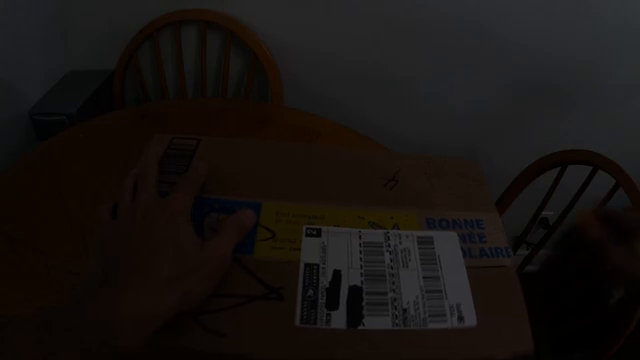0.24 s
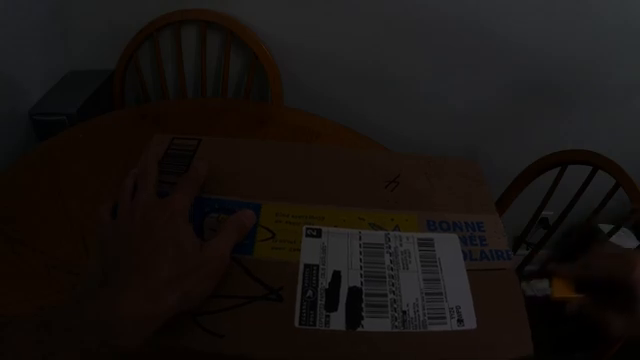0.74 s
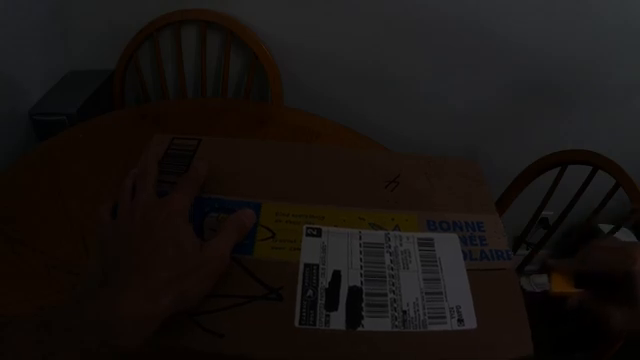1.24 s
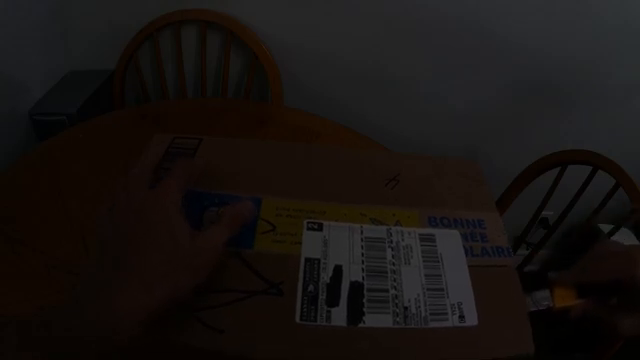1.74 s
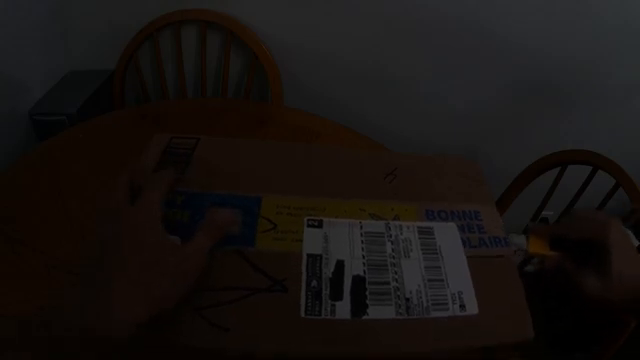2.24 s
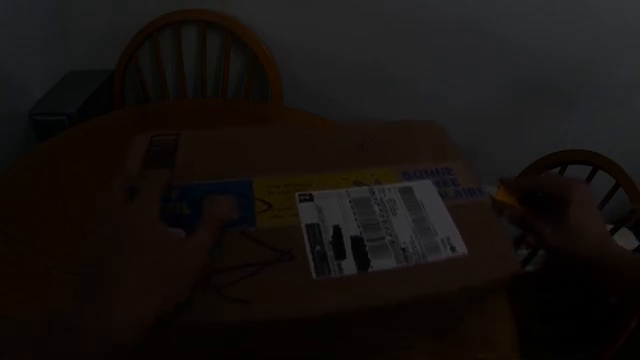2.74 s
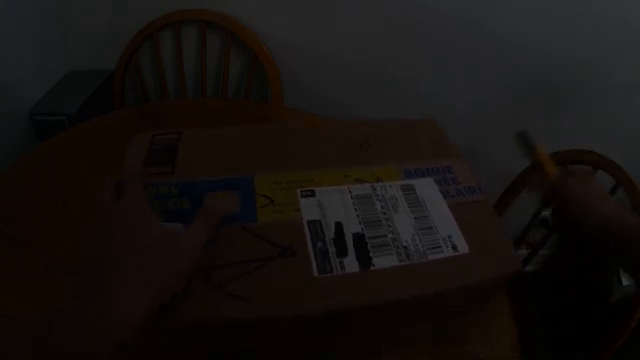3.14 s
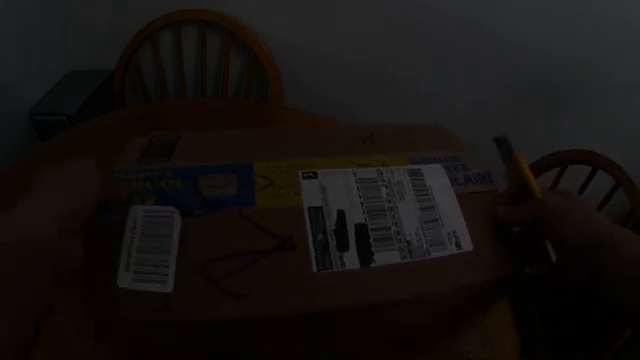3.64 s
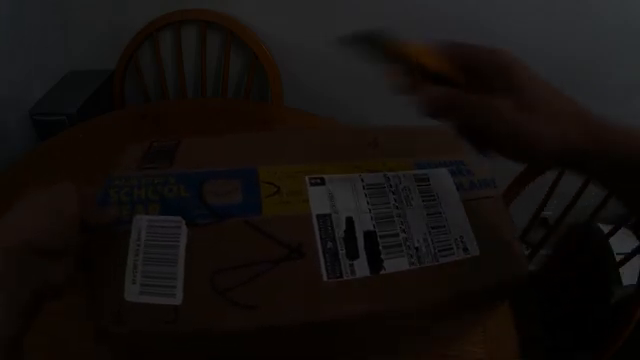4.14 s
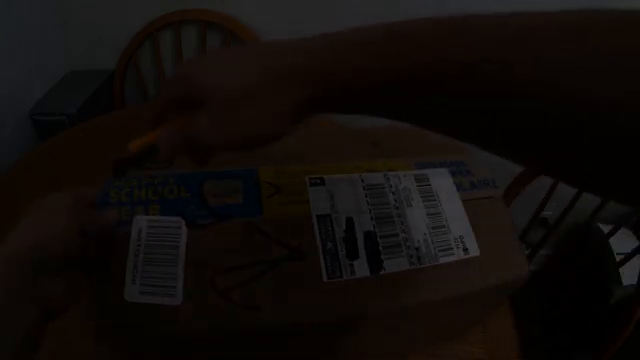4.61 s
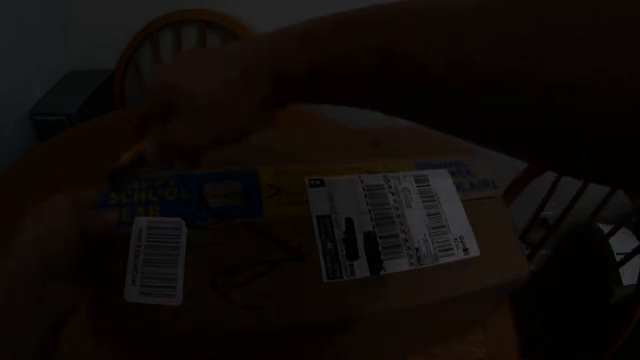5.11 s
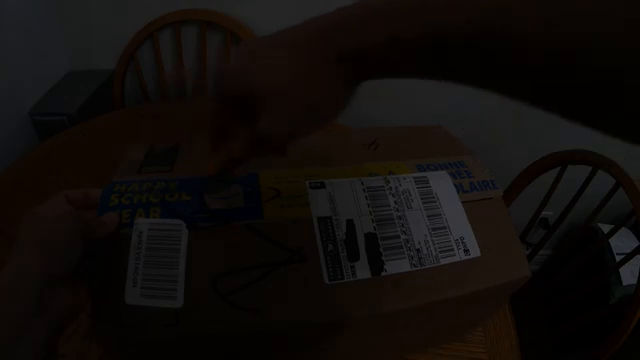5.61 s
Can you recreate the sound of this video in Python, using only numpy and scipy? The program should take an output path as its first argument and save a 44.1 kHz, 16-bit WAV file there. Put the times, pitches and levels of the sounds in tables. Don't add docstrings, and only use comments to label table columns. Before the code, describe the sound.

A blade bursts packing tape on a cardboard box with a thud and sharp rip, then handling knocks, and finally a hard pop and long raspy cut.

```python
import sys
import numpy as np
from scipy import signal
from scipy.fft import rfft, irfft, next_fast_len
from scipy.io import wavfile
from scipy.ndimage import uniform_filter1d

SR = 44100
rng = np.random.default_rng(int(sys.argv[2]) if len(sys.argv) > 2 else 0)


def store_wav(level_fs):
    pcm = np.round(np.clip(np.atleast_2d(level_fs), -1, 1) * 32767)
    wavfile.write(sys.argv[1], SR, pcm.T.astype(np.int16))


def ratio_of_db(decibels):
    return 10 ** (np.asarray(decibels, float) / 20)


N = 258867
CLOCK = np.arange(0, N / SR + .001, .001)

# centre_hz, width_hz, level_db
TABLE_MODES = [(52.7, 21, -8), (96.7, 30, -2), (148, 27, 0.5)]
PANEL_MODES = [(203, 29, -1.5), (255, 18.7, 0), (310, 36, -0.5), (390, 49, -0.5), (456.3, 45, 2),
               (586, 160, -8)]
BLADE_MODES = [(772, 183, -5.5), (1227, 406, -4), (2277, 720, -2), (2740, 880, -1), (3400, 720, -1.5),
               (4330, 740, -3.5), (5250, 500, -8)]
TAPE_MODES = [(6950, 1400, -2.5), (9750, 1150, 0.3), (11930, 2160, -0.14), (13830, 2500, -0.8),
              (15360, 840, 2)]

# frequency_hz, density_db (per Hz)
HUSH_SPECTRUM = [(15, -54), (25, -10.5), (137, 2.5), (269, -8), (438, -8), (589, -11), (815, -16.5),
                 (1130, -17.5), (1330, -18), (2820, -21), (15900, -23)]
# frequency_hz, t60_s
ROOM_DECAY = [(100, 0.18), (500, 0.26), (3000, 0.25), (12000, 0.28)]

# peak_s, blade_db, film_over_blade_db, rise_s, fall_s
SCRAPES = [(.01, -68, -6, .1, .3), (0.091, -30.5, -2, 0.017, 0.19), (.235, -52, -4, .5, .07),
           (2.96, -66, 2, .2, .2), (.53, -56, -14, .03, 0.32), (.74, -63, -2.5, 0.55, 0.71),
           (1.226, -68.5, -4, 0.21, .15), (1.456, -51, -3.5, 0.088, 0.19), (1.635, -57, -3, 0.088, 0.73),
           (2.055, -56, -3.5, 0.21, .17), (2.425, -65.5, 0, 0.35, 1.1), (2.66, -58, -2, 0.32, .1),
           (2.735, -43.5, -2, 0.16, .05), (2.75, -33, -0.5, .03, .03), (2.8, -46.5, -5, 0.12, 0.19),
           (3.12, -66, 1, 0.24, 3.9), (3.51, -62, 2.5, 0.35, 0.23), (3.58, -46, 3, 0.061, 0.19),
           (3.75, -58.5, -9, 0.76, 0.38), (3.84, -56.5, 2, 0.23, 0.15), (4.013, -59.5, -4, 0.13, 0.15),
           (4.477, -58.5, -6, 0.21, 0.33), (4.58, -59.5, -9, 0.38, 0.17), (4.8, -68, -4.5, 0.58, 4),
           (4.965, -53, -7.5, 0.046, 0.37), (5.159, -28, -6, 0.0094, 0.18)]
# peak_s, level_db, panel_pitch_hz, rise_s, fall_s
PRESSES = [(.03, -63, 300, .3, .3), (0.089, -29, 266, 0.029, 0.16), (.19, -43, 450, 0.14, 0.07),
           (.52, -43.5, 330, 0.0095, 0.13), (.62, -49, 222, .12, 0.19), (.76, -53.5, 400, 0.32, 0.13),
           (.88, -56, 314, 0.16, 0.12), (.99, -62.5, 260, .2, 0.096), (1.226, -59, 374, 0.13, 0.092),
           (1.43, -44.5, 377, 0.041, 0.19), (1.63, -51.5, 300, .12, 0.25), (1.72, -51.5, 415, 0.29, 0.13),
           (1.87, -58.5, 444, .2, 0.14), (2.065, -51.5, 274, 0.16, 0.094), (2.41, -59.5, 410, .2, 0.27),
           (2.545, -52, 330, 0.29, 0.16), (2.745, -34.5, 337, 0.14, 0.1), (2.84, -44.5, 250, 0.24, 0.11),
           (3.21, -53, 330, .2, 0.39), (3.36, -48.5, 218, .3, 0.83),
           (3.51, -44, 310, .04, .05), (3.585, -37.5, 294, 0.1, 0.17), (3.77, -46, 337, 0.2, 0.18),
           (4.013, -52.5, 296, 0.13, 0.088), (4.43, -52, 405, .12, .1), (4.477, -49.5, 397, 0.2, 0.19),
           (4.57, -52.5, 310, .2, 0.16), (4.76, -57.5, 221, 0.18, 0.71), (4.97, -44.5, 307, 0.043, 0.18),
           (5.03, -47, 300, 0.15, 0.094), (5.12, -55.5, 260, 0.091, 0.14), (5.16, -31, 290, 0.0069, 0.32)]
# start_s, length_s, level_db
SHOVES = [(0.08, 0.067, -42), (0.527, .065, -46), (0.658, 0.15, -53), (1.002, 0.14, -69),
          (1.413, 0.053, -56), (1.58, .24, -58), (2.032, .05, -60), (2.36, .09, -67), (2.444, 0.077, -56.5),
          (2.658, 0.21, -46), (3.103, .28, -63.5), (3.395, .37, -50), (3.892, 0.246, -68),
          (4.418, 0.095, -62), (4.733, 0.36, -53.5), (5.16, 0.26, -48.5), (5.5, .12, -56),
          (5.65, 0.11, -47), (5.8, .07, -53)]
SHOVE_RISE_S, SHOVE_FALL_S = 0.025, 0.13
SPAN_DB = 30.5
# time_s, pressure_db, film_over_blade_db, panel_pitch_hz, blade_tilt (in units of 3 dB per
CUT = [
    (5.2, -50, -22, 310, -1),
    (5.29, -45.5, -5, 345, -0.8),
    (5.373, -42.5, -1, 270, 0),
    (5.46, -41.5, 3.5, 259, 0),
    (5.549, -41, 7.5, 263, -0.7),
    (5.677, -37, 8, 325, -1.7),
    (5.765, -36, 9, 295, -0.3),
    (5.817, -40.5, 8, 345, -2.6),
    (5.87, -39.5, 14.5, 298, -1.5),
]
# time_s, blade_tilt (units of 3 dB per octave), film_tilt (units of
# 5 dB per octave)
ANGLES = [(.08, -1.06, 0.2), (.27, -1, -3), (.5, -2.5, 1), (.76, -1.5, 1), (.9, -0.9, 1.5),
          (1.45, -1.4, 3.5), (1.68, -2.5, 1.5), (1.97, 0.2, 1.3), (2.1, -2, 0), (2.65, -1.5, 0.9),
          (2.8, -1.5, -0.3), (3.35, -1.5, 0.7), (3.54, 0, -0.5), (3.66, -1.5, 0.9), (3.85, -1.2, 1),
          (4.0, -2.5, 0.5), (4.479, -1.1, 0.4), (5.1, -1.2, -0.5)]
CUT_BLADE_DB = -1.57
BLADE_YIELDS = 0.74
FILM_FALL = 0.8
FILM_TILT, FILM_BRIGHTENS = 0.1, 0.15

# start_s, length_s, pitch_hz, level_db
SQUEAKS = [(0, .012, 3400, -64), (0.02, 0.016, 3480, -69), (.525, .065, 2100, -66),
           (.095, 0.012, 9800, -31), (5.39, .07, 1550, -58), (.685, .032, 3420, -66),
           (.712, .028, 3200, -67), (5.405, .05, 2080, -56), (.862, 0.025, 1230, -55),
           (2.04, 0.032, 5400, -63), (2.04, .04, 7800, -66), (2.744, 0.012, 950, -31),
           (4.7, 0.081, 1000, -67), (4.956, .014, 3550, -52), (4.971, .011, 3550, -49),
           (4.986, .009, 3800, -54), (5.005, .03, 3800, -62), (4.77, .036, 14450, -71),
           (4.845, .036, 14500, -71), (5.024, .036, 14400, -69), (5.096, .036, 14450, -71),
           (2.04, 0.023, 2900, -53.5), (5.157, 0.01, 4450, -26), (5.156, 0.02, 6850, -32.5),
           (3.506, 0.014, 1100, -54), (3.555, .014, 1050, -52), (1.455, .05, 4350, -63)]
# start_s, length_s, pitch_hz, level_db
BREAKTHROUGH = (5.1743, .0006, 4300, -8.5)

# start_s, tape_peak_db, blade_db (re tape), t60_s
SNAPS = [(0.0798, -27, 5.5, 0.048), (.0964, -18, -5, .022), (0.11, -26, 1.5, .024), (.513, -53, 8, 0.03),
         (.863, -46, 2, 0.02), (1.4177, -45.5, -3, .035), (2.0453, -37, 1, .026), (2.7072, -37, -2, 0.05),
         (2.744, -27.5, -3, 0.036), (3.5775, -23.5, -7, 0.024), (3.556, -42, -11, .03),
         (3.503, -50, -6, .06), (3.742, -58, 6, .02), (3.8546, -41, 1, 0.026), (4.0001, -52, 8, 0.03),
         (4.9636, -59, -5, .027), (5.1551, -16, 2.5, 0.025)]
# start_s, tape_peak_db, blade_db (re tape)
TICKS = [(.7916, -44, 2), (.8714, -52, -8), (1.9914, -47, 3), (2.0385, -36.5, 0), (2.0943, -41.5, 0.5),
         (2.387, -55, -7), (2.4443, -47, 0), (2.507, -41, -4), (2.6274, -43.5, -5.5), (2.6704, -55, -7),
         (2.7228, -26.5, -5), (2.7474, -25, -1), (2.8504, -48, -1), (3.5661, -30, -15), (3.9772, -52, -5),
         (4.4588, -47, 7.5), (4.9866, -47, 3), (5.0739, -51, -3), (5.1742, -13, -2), (5.5744, -36, -22)]
TICK_T60_S = 0.014

# start_s, peak_db, pitch_hz
THUDS = [(.08, -23, 150), (.0868, -19, 150), (.1065, -25, 155), (.119, -27, 150), (.51, -27, 170),
         (.53, -32, 170), (.543, -33, 149), (.565, -33, 160), (.59, -38, 213), (.612, -39, 227),
         (.722, -38, 140), (.812, -37, 95), (.684, -35.5, 124), (.789, -37, 125), (.853, -35.5, 138),
         (2.037, -39.5, 124), (2.453, -39.5, 142), (2.528, -31.5, 148), (2.551, -30.5, 155),
         (2.747, -20.5, 169), (2.911, -35.5, 108), (3.583, -38, 196), (5.159, -18, 130),
         (5.174, -16.5, 151), (5.194, -19.5, 148)]
KNOCKS = [(.081, -23, 622), (.097, -23.5, 826), (.103, -20, 282), (.111, -24.5, 614), (.122, -26.5, 252),
          (.514, -37, 408), (.52, -43, 577), (.548, -42.5, 570), (.79, -44, 380), (.856, -39.5, 467),
          (.858, -41, 323), (.872, -42.5, 400), (.2, -42, 485), (.215, -39, 507), (3.556, -32, 334),
          (3.72, -44, 328), (3.775, -39.5, 305), (3.83, -48, 560), (3.865, -47, 550), (2.45, -46, 310),
          (1.426, -38, 380), (1.459, -35, 366), (2.749, -28, 432), (2.918, -38.5, 200), (3.149, -48.5, 390),
          (3.506, -33.5, 317), (3.572, -29.5, 302), (3.744, -29, 390), (4.458, -38, 413),
          (4.485, -34.5, 397), (4.718, -45.5, 317), (4.968, -33, 297), (5.009, -32, 281), (5.157, -18, 463),
          (5.164, -23, 294), (5.175, -21.5, 410), (5.184, -20.5, 310), (5.199, -20.5, 468),
          (5.206, -27, 400), (5.216, -28, 410), (5.226, -29, 480), (5.753, -21, 320)]
BUCKLES = [(.5122, -29, 240), (.5153, -19, 175), (.0815, -21, 300), (.148, -31, 500), (2.697, -33, 330),
           (2.712, -24, 310), (2.725, -23, 402), (2.7485, -13, 350), (2.76, -23.5, 220), (2.77, -20.5, 256),
           (2.778, -20.5, 420), (2.799, -25, 264), (2.816, -34, 300), (2.86, -36, 250), (2.885, -39, 300),
           (1.545, -47, 200), (1.5, -44, 420)]
ROCKING = [(1.583, -46, 115), (1.617, -43, 90), (1.652, -39, 115), (1.677, -39, 100), (1.718, -42, 105),
           (1.752, -44, 110), (1.788, -41, 125), (1.82, -44, 100), (1.837, -42, 116), (4.754, -41, 95),
           (4.793, -43, 95), (4.832, -45, 95), (4.871, -45, 95), (4.91, -46, 95)]
JUDDERS = [(5.517, -33, 323), (5.527, -30.5, 310), (5.589, -33, 310), (5.606, -23, 300),
           (5.633, -23.5, 285), (5.652, -28, 294), (5.664, -21, 264), (5.683, -31, 187),
           (5.695, -28.5, 280), (5.71, -29.5, 334), (5.72, -25, 290), (5.738, -34, 340),
           (5.771, -32.5, 149), (5.775, -34, 382), (5.6, -36, 450), (5.805, -37, 480), (5.832, -35, 430)]
CRACKLES = [(.081, -22, 2460), (.094, -36, 2470), (.103, -28, 3870), (.104, -28, 2360), (.109, -29, 3700),
            (.12, -39, 3620), (.087, -32, 3000), (.098, -31, 2900), (.115, -33, 2200), (.127, -35, 3000),
            (.136, -36, 2600), (.151, -34, 2150), (.515, -46, 1150), (.791, -52, 950), (1.546, -55, 1360),
            (1.617, -53, 1010), (1.628, -57, 3200), (2.812, -46, 2250), (2.826, -47, 1200),
            (2.858, -49, 1000), (2.885, -52, 900), (2.925, -52, 1300), (4.0, -53, 1100), (5.222, -38, 3500),
            (1.43, -58, 4400), (1.446, -51, 3780), (1.452, -55, 4400), (1.449, -50, 2300),
            (1.456, -46, 2230), (1.464, -55, 3760), (1.473, -49, 2350), (2.629, -52, 830),
            (2.648, -55, 4200), (2.655, -42, 985), (2.672, -46, 820), (2.696, -37, 1020),
            (2.709, -46, 3900), (2.723, -44, 3630), (2.744, -36, 2430), (2.75, -30.5, 3200),
            (2.779, -42, 1000), (2.799, -42, 900), (2.851, -48, 3420), (3.565, -47, 4300),
            (3.565, -46, 1150), (3.578, -32.5, 4350), (3.579, -34, 2590), (3.595, -43, 2370),
            (3.743, -47, 1200), (3.579, -40, 5400), (3.843, -51, 4110), (3.855, -44.5, 3590),
            (5.157, -23, 2170), (5.1748, -23, 4280), (5.181, -28, 2360), (5.183, -32, 4300),
            (5.182, -32, 3500), (5.198, -35, 2600), (5.162, -30, 4500), (5.158, -29, 1150),
            (5.19, -32, 1200), (.081, -31, 5100), (.082, -29, 3500)]
THUD_T60_S, KNOCK_T60_S, BUCKLE_T60_S = 0.059, 0.053, 0.026
ROCK_T60_S, JUDDER_T60_S, CRACKLE_T60_S = 0.06, 0.055, 0.017

# time_s, upper_hz, upper_db, lower_hz, lower_db (re blade friction)
BITES = [(5.14, 4450, -40, 2150, -34), (5.16, 4400, -20, 2190, -10), (5.28, 4300, -12, 2640, -12),
         (5.35, 4500, -7, 3150, -13), (5.42, 4850, -8, 3400, -9), (5.46, 4500, -12, 3300, -15),
         (5.51, 5000, -7, 2800, -25), (5.55, 4400, -6, 3050, -13), (5.61, 4900, -13, 3150, -11),
         (5.68, 4300, -8, 3500, -10), (5.75, 4950, -8, 3300, -17), (5.79, 4550, -13, 3150, -6),
         (5.87, 4830, -16, 3220, -9)]
BITE_WIDTH_HZ = 380
GAP_HZ, GAP_WIDTH_HZ, GAP_DB = 5800, 450, -2.5


def unit(x):
    return x / np.sqrt(np.mean(x ** 2) + 1e-20)


def along(points, hz):
    f, v = np.transpose(points)
    return np.interp(np.log(hz + 1), np.log(f + 1), v)


def filtered(x, response):
    size = next_fast_len(N + SR // 2)
    return irfft(rfft(x, size) * response(np.fft.rfftfreq(size, 1 / SR)), size)[:N]


def add(track, s, piece):
    spot = track[round(s * SR):][:len(piece)]
    spot += piece[:len(spot)]


def hush():
    noise = filtered(rng.standard_normal(N), lambda hz: ratio_of_db(along(HUSH_SPECTRUM, hz)))
    return ratio_of_db(-68) * unit(noise)


def stroke(s, db, rise, fall, hold=0):
    before = (s - CLOCK) / max(rise, .004)
    after = (CLOCK - s - hold) / max(fall, .004)
    return db - SPAN_DB * np.clip(np.maximum(before, after), 0, 4)


def controls():
    read = lambda rows: [np.interp(CLOCK, rows[0], column) for column in rows[1:]]
    pressure_db, film_db, cut_hz, cut_tilt = read(np.transpose(CUT))
    blade_tilt, tape_tilt = read(np.transpose(ANGLES))
    pressure_db = pressure_db + stroke(CUT[0][0], 0, .01, 1, hold=1)
    cut_db = pressure_db + CUT_BLADE_DB - BLADE_YIELDS * film_db

    shoves = [stroke(s, db, SHOVE_RISE_S, SHOVE_FALL_S, hold) for s, hold, db in SHOVES]
    blades = [stroke(s, db, rise, fall) for s, db, _, rise, fall in SCRAPES]
    films = [stroke(s, db + film, rise, FILM_FALL * fall) for s, db, film, rise, fall in SCRAPES]
    table = np.max(shoves, axis=0)
    blade = np.max(blades + [cut_db], axis=0)
    tape = np.max(films + [cut_db + film_db], axis=0)

    hands = PRESSES
    loads = np.array([stroke(s, db, rise, fall) for s, db, _, rise, fall in hands] + [pressure_db])
    weight = ratio_of_db(2 * loads)
    pitches = [row[2] for row in hands]
    pitch_hz = (pitches @ weight[:-1] + cut_hz * weight[-1]) / weight.sum(axis=0)

    cutting = CLOCK > 5.15
    blade_tilt = np.where(cutting, cut_tilt, blade_tilt)
    tape_tilt = np.where(cutting, FILM_TILT + FILM_BRIGHTENS * (tape - blade), tape_tilt)
    rows = table, loads.max(axis=0), blade, tape, pitch_hz, blade_tilt, tape_tilt
    return [np.interp(np.arange(N) / SR, CLOCK, row) for row in rows]


def slips(per_s, spread_db, smooth):
    when, how_big, which_way = rng.random((3, N))
    size = ratio_of_db(-spread_db * np.log(how_big + .02))
    grains = (when < per_s / SR) * size * np.sign(which_way - .5)
    share = np.clip(smooth, 0, 1)
    return np.sqrt(1 - share) * unit(grains) + np.sqrt(share) * rng.standard_normal(N)


def drift(x, patchy_db):
    z = signal.stft(x, nperseg=512)[2]
    field = uniform_filter1d(rng.standard_normal(z.shape), size=5, axis=0)
    field = uniform_filter1d(field, size=18, axis=1)
    return unit(signal.istft(z * ratio_of_db(patchy_db * unit(field)), nperseg=512)[1][:N])


def rubbing(table_db, panel_db, blade_db, tape_db):
    table_db, panel_db = np.minimum(table_db, -46), np.minimum(panel_db, -35)
    soft = lambda force, size: np.convolve(force, np.hanning(size) * 2 / size, "same")
    table = soft(slips(per_s=60, spread_db=2.5, smooth=0.35), size=120)
    panel = soft(slips(per_s=110, spread_db=4.0, smooth=0.39), size=24)
    blade = drift(slips(per_s=1800, spread_db=2.0, smooth=0.54), patchy_db=2.5)
    tape = drift(slips(per_s=3500, spread_db=4.5, smooth=0.71), patchy_db=2.5)
    return (ratio_of_db(table_db - 1.0) * table, ratio_of_db(panel_db - 0.08) * panel,
            ratio_of_db(blade_db + 0.5) * blade, ratio_of_db(tape_db + 0.5) * tape)


def body(force, modes, favour_db):
    out, power = np.zeros(N), 0
    for k, (hz, width, db) in enumerate(modes):
        gain = ratio_of_db(db + favour_db(hz))
        out += (-1) ** k * signal.lfilter(*signal.iirpeak(hz, hz / width, SR), force * gain)
        power = power + gain ** 2 * width
    return out / np.sqrt(uniform_filter1d(power, size=400) * np.pi / SR)


def squeaks():
    out = np.zeros(N)
    for s, length, hz, db in SQUEAKS + [BREAKTHROUGH]:
        t = np.arange(round(length * SR)) / SR
        wander = np.cumsum(rng.normal(0, 0.12 * max(1, hz / 7000), SR // 8))[:len(t)]
        swell = np.sin(np.pi * t / length)
        add(out, s, ratio_of_db(db) * swell * np.sin(2 * np.pi * hz * t + wander))
    return out


def snaps():
    blade, tape, t = np.zeros(N), np.zeros(N), np.arange(SR // 8) / SR
    for s, db, blade_db, t60 in SNAPS + [(*tick, TICK_T60_S) for tick in TICKS]:
        decay = ratio_of_db(db - 4.5 - 60 * t / np.clip(t60, .003, .3))
        burst = decay * rng.standard_normal((2, len(t)))
        add(tape, s, burst[0])
        add(blade, s, ratio_of_db(blade_db) * burst[1])
    return blade, tape


def bumps():
    kinds = [(THUDS, THUD_T60_S), (KNOCKS, KNOCK_T60_S), (BUCKLES, BUCKLE_T60_S),
             (ROCKING, ROCK_T60_S), (JUDDERS, JUDDER_T60_S), (CRACKLES, CRACKLE_T60_S)]
    out, t = np.zeros(N), np.arange(SR // 4) / SR
    for blows, t60 in kinds:
        for s, db, hz in blows:
            rise = 1 - np.exp(-t / min(0.0018, 2 / hz))
            ring = np.sin(2 * np.pi * hz * t) + 0.16 * np.sin(2 * np.pi * 1.62 * hz * t)
            decay = ratio_of_db(db - 60 * t / np.clip(t60, .01, .25))
            add(out, s, decay * rise * -ring)
    return signal.lfilter(*signal.butter(2, 50, "high", fs=SR), out)


def table_reflection(x):
    def gap(hz):
        detuning = GAP_HZ ** 2 - hz ** 2
        damping = 1j * hz * GAP_WIDTH_HZ
        return (detuning + damping * ratio_of_db(GAP_DB)) / (detuning + damping)
    return filtered(x, gap)


def room(x):
    out, hop = np.zeros(N), SR // 4
    for start in range(0, N, hop):
        hz, t, z = signal.stft(rng.standard_normal(SR // 2), SR, nperseg=256)
        decay = ratio_of_db(-60 * t / along(ROOM_DECAY, hz)[:, None])
        tail = signal.istft(z * decay, SR, nperseg=256)[1]
        tail = tail / np.linalg.norm(tail)
        add(out, start / SR + .004, signal.fftconvolve(x[start:start + hop], tail))
    return out


def bite(force):
    s, *columns = np.transpose(BITES)
    high_hz, high_db, low_hz, low_db = [np.interp(np.arange(N) / SR, s, column) for column in columns]
    out, pole = np.zeros(N), np.exp(-np.pi * BITE_WIDTH_HZ / SR)
    force = force * np.sign(rng.standard_normal(N))
    for hz, db in [(high_hz, high_db), (low_hz, low_db)]:
        turn = np.exp(2j * np.pi * np.cumsum(hz) / SR)
        ringing = signal.lfilter([np.sqrt(2 - 2 * pole ** 2)], [1, -pole], force / turn)
        out += ratio_of_db(db) * np.real(turn * ringing)
    return out


def scene():
    *levels, pitch_hz, blade_tilt, tape_tilt = controls()
    table, panel, blade, tape = rubbing(*levels)
    blade_snap, tape_snap = snaps()
    near = body(table, TABLE_MODES, lambda hz: np.zeros(N)) + bumps() + squeaks() + bite(blade)
    near += body(panel, PANEL_MODES, lambda hz: -14 * np.abs(np.log2(hz / pitch_hz)))
    near += body(blade + blade_snap, BLADE_MODES, lambda hz: 3 * blade_tilt * np.log2(hz / 2000))
    near += body(tape + tape_snap, TAPE_MODES, lambda hz: 5 * tape_tilt * np.log2(hz / 10000))
    near = table_reflection(near)
    background = hush()
    return (near + ratio_of_db(-7.5) * room(near) + background)[None]


def band_limit(x):
    return signal.sosfilt(signal.butter(12, 17040, fs=SR, output="sos"), x)


def record(dry):
    limited = filtered(dry[0], lambda hz: np.where(hz < 15770, 1, ratio_of_db(-36)))
    return band_limit(limited[None])


dry = scene()
out = record(dry)
store_wav(out)
```